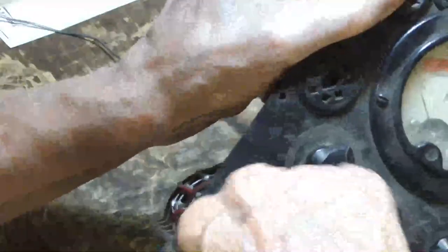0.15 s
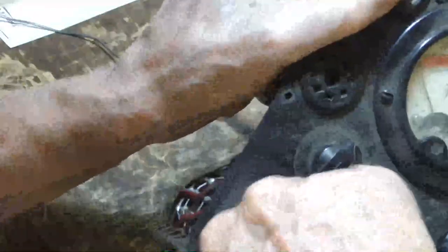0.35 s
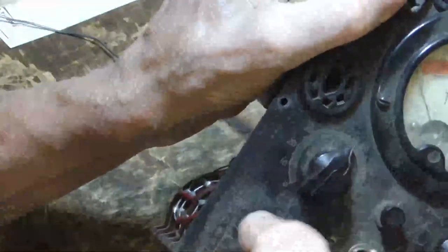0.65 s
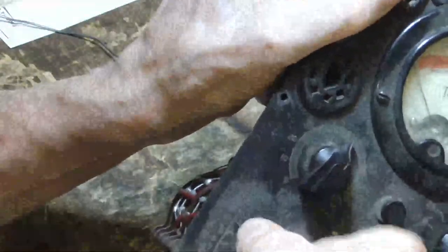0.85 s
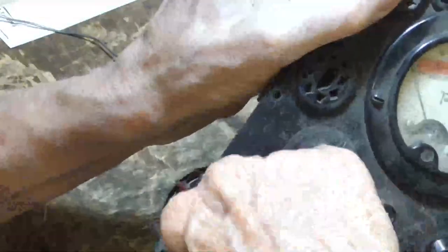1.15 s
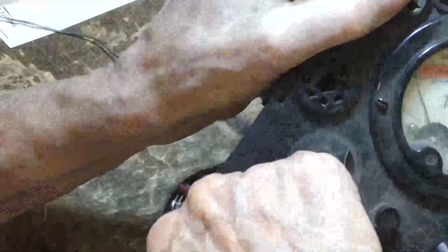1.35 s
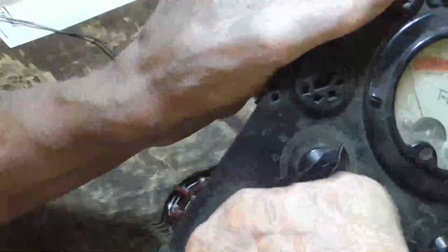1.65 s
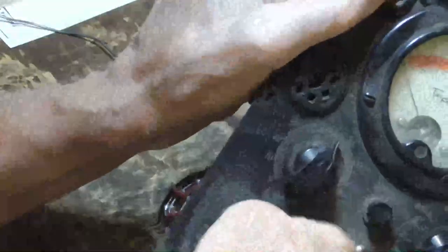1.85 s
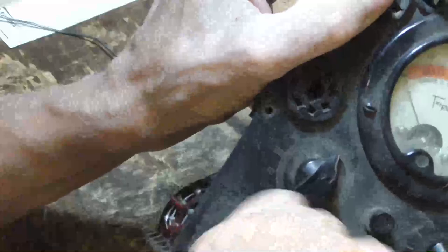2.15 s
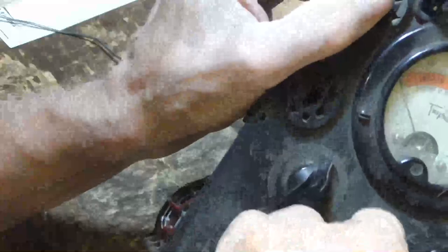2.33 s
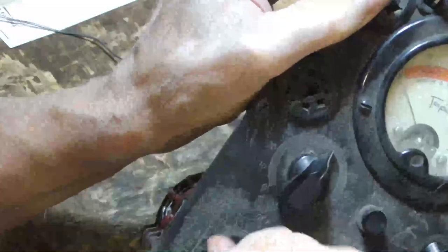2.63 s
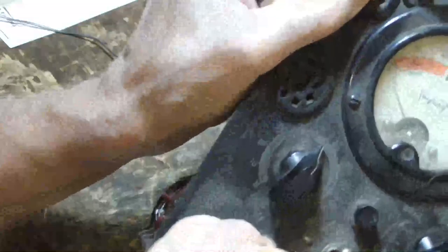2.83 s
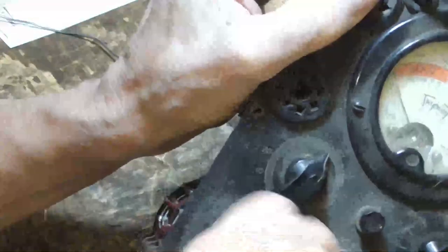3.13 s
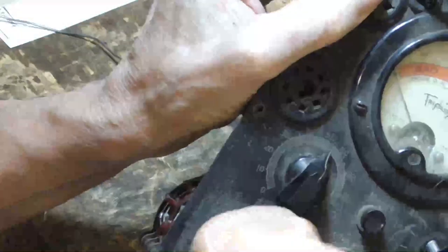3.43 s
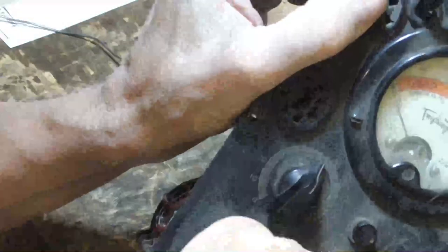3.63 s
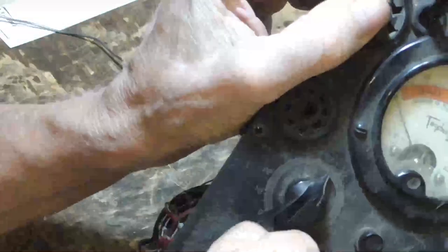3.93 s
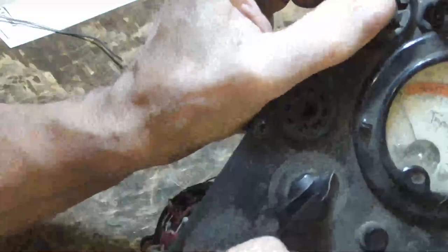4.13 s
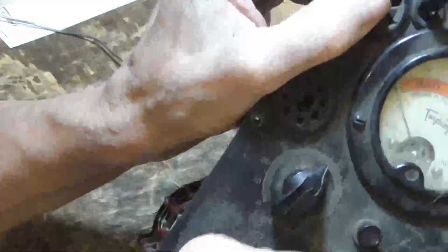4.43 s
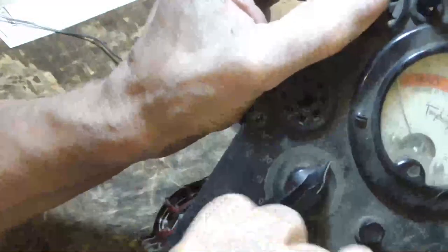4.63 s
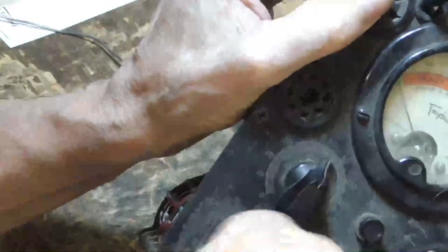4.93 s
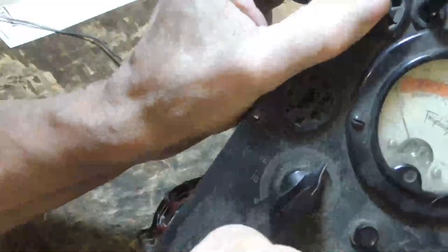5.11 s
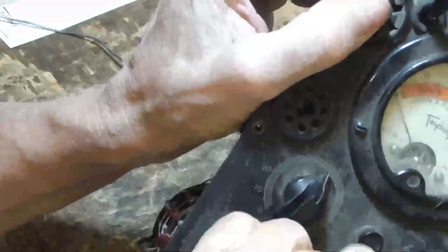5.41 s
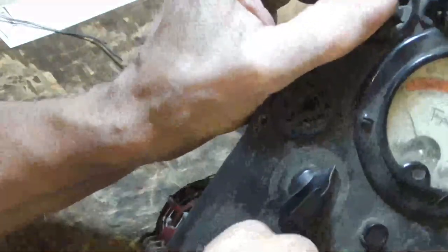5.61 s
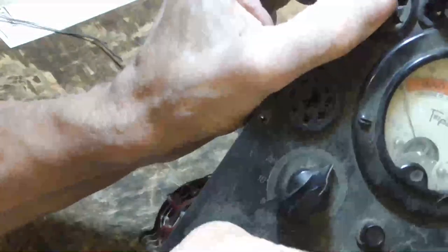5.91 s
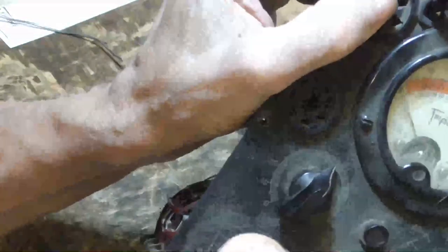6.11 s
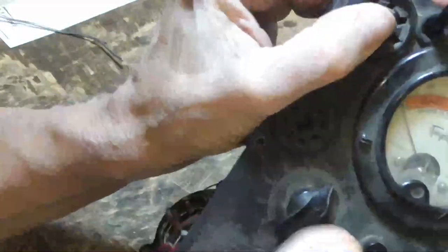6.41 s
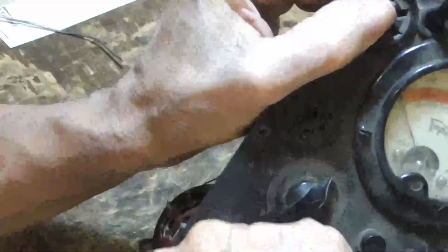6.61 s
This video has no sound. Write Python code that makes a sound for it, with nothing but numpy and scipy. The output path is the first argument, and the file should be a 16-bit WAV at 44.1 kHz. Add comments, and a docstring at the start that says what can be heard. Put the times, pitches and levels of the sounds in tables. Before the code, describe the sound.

A stiff rotary switch is spun by hand in nine quick ratcheting bursts of bright clicks over a steady low motor hum.

```python
"""A motor hums and its fan pushes air; over this a hand spins a clicking rotary selector through nine sweeps.
The hum is a set of unsteady sine tones at multiples of the shaft speed; the air is coloured noise.
Each click is three shaped noise bursts, a bright snap, a clack and a low thud, plus a faint ring of metal.
Sliding wipers rasp while the knob turns, the case swells in low booms, and a small hard room answers each click."""
import sys
import numpy as np
from scipy import signal
from scipy.fft import rfft, irfft, next_fast_len
from scipy.io import wavfile
from scipy.ndimage import uniform_filter1d, map_coordinates

SR = 44100
rng = np.random.default_rng(int(sys.argv[2]) if len(sys.argv) > 2 else 0)


def to_wav(sig):
    """Store sig (one row per channel, or 1-D mono) as 16-bit WAV at the path in sys.argv[1].

    Samples outside -1..1 are clipped; the rate is SR.
    """
    pcm = np.clip(np.atleast_2d(sig), -1, 1) * 32767
    pcm = np.round(pcm).astype(np.int16)
    wavfile.write(sys.argv[1], SR, pcm.T)  # frames by channels


N = 298116  # length in samples


def amp(db):
    """Turn decibels into a gain."""
    return 10 ** (np.asarray(db) / 20)


def unit(x):
    """Scale a sound to an rms level of 1."""
    return x / np.sqrt(np.mean(x ** 2) + 1e-20)


def along(points, hz):
    """Read a curve of (Hz, value) points on a log frequency axis."""
    point_hz, value = np.transpose(points)
    return np.interp(np.log(hz + 1), np.log(point_hz + 1), value)


def wobble(rate):
    """A smooth random curve with `rate` random points a second."""
    knots = rng.standard_normal(int(N * rate / SR) + 4)
    return map_coordinates(knots, [np.arange(N) * rate / SR])


def noise(spectrum, alike, size):
    """Stereo noise of rms 1 with a given colour and left-right likeness (1 = the same in both ears)."""
    hz = np.fft.rfftfreq(size, 1 / SR)
    # likeness sets how the power is shared between the middle and the sides
    turn = np.arccos(np.clip(along(alike, hz), -1, 1)) / 2
    white = rfft(rng.standard_normal((2, size)))
    shares = [np.cos(turn), np.sin(turn)]
    mid, side = irfft(white * amp(along(spectrum, hz)) * shares, size)
    return unit(np.array([mid + side, mid - side]))


# Tones of the motor, before the slow level curve and their own wobble.
# Columns: shaft_multiple [times shaft speed], level_db [dB rms]
MOTOR_TONES = [(1, -59.5), (2, -58.5), (2.3, -61.5), (3, -44.5), (4, -41.5), (5, -51.5), (6, -51.5),
               (6.15, -52), (7, -61), (8, -56.5), (9, -58), (13, -64), (13.75, -60), (16, -54.5), (18, -59),
               (21.82, -57.5)]
# Slow rise and fall of the whole hum. Columns: time_s [s], level_db [dB]
HUM_SWELL = [(0, 0), (1.3, 1.3), (2.5, -0.3), (4, -0.6), (5.5, -1.5), (6.76, -1.5)]
SHAFT_HZ = 57.65  # average turns a second


def motor():
    """A turning shaft hums at multiples of its speed, a little unsteady in speed and in strength."""
    turns = np.cumsum(SHAFT_HZ * (1 + 0.000984 * wobble(2.953))) / SR
    hum = np.zeros(N)
    for multiple, level_db in MOTOR_TONES:
        strength = amp(level_db + 1.1 * wobble(5))
        hum += strength * np.sin(2 * np.pi * (multiple * turns + rng.random()))
    swell_db = np.interp(np.arange(N) / SR, *np.transpose(HUM_SWELL))
    left_right = amp([[-.3], [.3]])
    return np.sqrt(2) * amp(swell_db) * hum * left_right  # sqrt(2): from rms to peak of a sine


# Colour of the fan's rush. Columns: pitch_hz [Hz], level_db [relative dB per Hz]
FAN_COLOUR = [(25, -56), (70, -14), (100, -21), (122, -4), (150, -13), (200, 1.5), (340, 0), (410, -4.5),
              (510, -10), (640, -3), (900, -5), (1250, -10), (1650, -21), (2500, -58)]
# Colour of the faint hiss. Columns: pitch_hz [Hz], level_db [relative dB per Hz]
HISS_COLOUR = [(900, -7), (1800, 0.5), (2700, -5), (3900, -5), (6200, -12), (8000, -8.5), (10000, -11.5),
               (13000, -20), (16000, -28)]
# How alike the air is in both ears. Columns: pitch_hz [Hz], likeness [0 to 1]
AIR_LIKENESS = [(60, 0.68), (200, 1), (400, 0.79), (900, 0.73), (2000, 0.5), (8000, 0.25)]


def air():
    """The motor's fan stirs the air into a low noise, with a faint hiss above it."""
    rush = amp(-39.5 + 0.15 * wobble(12)) * noise(FAN_COLOUR, AIR_LIKENESS, N)
    hiss = amp(-56) * noise(HISS_COLOUR, AIR_LIKENESS, N)
    left_right = amp([[-.3], [.3]])
    return (rush + hiss) * left_right


# The knob in each sweep, turning evenly from one point to the next; one list for each sweep.
# Columns: time_s [s], position [detents], force_db [dB, force of the hand]
KNOB_SWEEPS = [
    [(0.048, 0, -20), (0.1056, 1, -26), (0.1397, 2, -24), (0.164, 3, -24), (0.1747, 4, -22),
     (0.2383, 7, -24), (0.2794, 8, -22.5), (0.3729, 9, -24)],
    [(0.969, 0, -22), (1.01, 1, -24), (1.0647, 2, -22), (1.14, 5, -26), (1.2432, 8, -27), (1.3343, 9, -32)],
    [(1.7816, 0, -29), (1.824, 2, -34), (1.8807, 4, -27.5), (1.9115, 6, -23), (1.9454, 8, -24),
     (1.9728, 9, -30)],
    [(2.6643, 0, -18.5), (2.685, 1, -24), (2.7217, 2, -22), (2.7646, 3, -22.5), (2.8227, 5, -23),
     (2.8493, 6, -26), (2.9137, 9, -26)],
    [(3.3995, 0, -22.5), (3.4303, 1, -30), (3.4842, 2, -31), (3.5685, 5, -27.5), (3.6415, 9, -26),
     (3.6805, 10, -32)],
    [(4.2095, 0, -20.5), (4.2395, 1, -24.5), (4.302, 3, -25), (4.3465, 5, -25), (4.3723, 7, -25),
     (4.392, 8, -25.5)],
    [(4.886, 0, -22), (4.913, 1, -27), (4.9916, 3, -28.5), (5.0175, 4, -24), (5.105, 9, -23.5),
     (5.1453, 10, -28.5)],
    [(5.6906, 0, -20.5), (5.7196, 1, -23), (5.8057, 3, -23.5), (5.84, 4, -20.5), (5.8815, 5, -25),
     (6.0173, 9, -27.5)],
    [(6.4651, 0, -19.5), (6.4937, 1, -29), (6.5664, 3, -26.5), (6.581, 4, -21), (6.6285, 7, -23),
     (6.651, 8, -26)],
]


def detents():
    """List (s, force dB, detents a second, share of sweep done) each time the knob passes a whole position."""
    rows = []
    for sweep in KNOB_SWEEPS:
        time_s, position, force_db = np.transpose(sweep)
        position = np.round(position)
        notches = np.arange(position[0], position[-1] + 1)
        times = np.interp(notches, position, time_s)
        forces = np.interp(notches, position, force_db)
        steps = np.maximum(np.abs(np.diff(times)), .005)  # seconds from click to click
        speeds = 1 / np.r_[steps[0], steps]
        rows += zip(times, forces, speeds, np.linspace(0, 1, len(times)))
    return np.array(rows)


USUAL_FORCE_DB, USUAL_SPEED = -25, 34.6  # an ordinary turn: dB, detents a second
SPRING_HZ, SPRING_SCATTER = 11500, 0.053  # middle pitch of the spring, and its random spread as a share
# body clack against the snap at an ordinary turn; dB lost per dB of force; dB per doubling of speed
CLACK_DB, CLACK_FALLS, CLACK_DB_PER_DOUBLING = -5.5, 0.29, -0.5
THUD_DB, THUD_SCATTER_DB = -39, 2  # case thud at the start of a sweep at usual speed, and its spread
THUD_GROWS_DB, THUD_DB_PER_DOUBLING = 4.5, 3.5  # extra by the end of a sweep; extra per doubling of speed


def blow(force_db, speed, done):
    """Force sets the snap; the clack lags behind it; the case rocks more with speed and through the sweep."""
    doublings = np.log2(speed / USUAL_SPEED)
    clack_db = CLACK_DB - CLACK_FALLS * (force_db - USUAL_FORCE_DB) + CLACK_DB_PER_DOUBLING * doublings
    thud_db = THUD_DB + THUD_GROWS_DB * done + THUD_DB_PER_DOUBLING * doublings
    thud_db += THUD_SCATTER_DB * rng.standard_normal()
    ring_hz = SPRING_HZ * (1 + SPRING_SCATTER * rng.standard_normal())
    return force_db, clack_db, thud_db, ring_hz


def varied(spectrum, spread_db):
    """No two detents seat alike: give each its own broad bumps of colour."""
    return [(hz, db + spread_db * rng.standard_normal()) for hz, db in spectrum]


def burst(carrier, envelope):
    """Shape a carrier so that its energy is that of the envelope."""
    return unit(carrier * envelope) * np.sqrt(np.mean(envelope ** 2))


def strike(t, rise, fall):
    """An envelope that swells up to t = 0 and dies after it; rise and fall in seconds."""
    return np.exp(np.minimum(t, 0) / rise - np.maximum(t, 0) / fall)


def doubled(x, copy_db=-7):
    """A quieter copy follows within about a millisecond, giving each click a varied, comb-like colour."""
    lag = round(rng.uniform(.0002, .0012) * SR)
    return (x + amp(copy_db) * np.roll(x, lag, axis=1)) / np.hypot(1, amp(copy_db))


# Middle colours of the contacts' snap and the body's clack, and the colour of the case's thud.
# Columns: pitch_hz [Hz], level_db [relative dB per Hz]
SNAP_COLOUR = [(4500, -13), (6500, -13.5), (7900, -4), (10000, 0.5), (11800, 0), (13200, -1.5), (15000, -7),
               (16000, -14)]
CLACK_COLOUR = [(300, -12), (900, -2), (1400, -5.5), (1900, -6), (2600, -6), (3400, 3.5), (4700, 5.5),
                (6000, -4), (8000, -3)]
THUD_COLOUR = [(30, -55), (62, -4), (88, -9), (100, -12.5), (120, 1.5), (148, -2.5), (190, 7), (250, -1.5),
               (370, -6.5), (500, -7.5), (1000, -16.5)]
# Faint ring of the metal parts, around which each detent varies.
# Columns: pitch_hz [Hz], level_db [relative dB], t60_s [s to fall by 60 dB]
METAL_RING = [(1530, -27, 0.059), (3450, -27, 0.051), (4610, -26, .04), (5280, -24.5, 0.075),
              (7860, -28, .03), (11200, -17, .02)]


def detent(snap_db, clack_db, thud_db, ring_hz, size=4096):
    """The contacts scrape over the cam, snap home and jolt the body and the case."""
    t = (np.arange(size) - size // 16) / SR  # t = 0 is the snap
    ring = [(ring_hz / 2, -70), (ring_hz * .85, -30), (ring_hz * .95, -6), (ring_hz, 0),
            (ring_hz / .95, -6), (ring_hz / .85, -30), (SR / 2, -60)]
    contacts = noise(varied(SNAP_COLOUR, spread_db=1.2), [(8000, 0.72), (14000, 0.41)], size)
    spring = noise(ring, [(10000, 0.56)], size)
    # a scrape leads in, the spring seats with a hard peak, then chatters for a few milliseconds
    scrape = amp(-14) * strike(t, rise=.0088, fall=.0011)
    seat = strike(t, rise=.0008, fall=.0007)
    chatter = amp(-5) * strike(t, rise=.0011, fall=.0043)
    snap_shape = amp(2) * (seat + chatter) + scrape
    left_right = amp([[-2.2], [1.8]])
    snap = amp(snap_db) * burst(contacts + amp(-13) * spring, snap_shape) * left_right

    body = noise(varied(CLACK_COLOUR, spread_db=1.1), [(1000, 0.63), (5000, 0.99)], size)
    clack = amp(snap_db + clack_db) * burst(body, strike(t, rise=.0022, fall=.0054))
    case = noise(THUD_COLOUR, [(100, 0.92)], size)
    thud = amp(thud_db) * burst(case, strike(t - .003, rise=.0038, fall=.021))  # peaks 3 ms late

    after = np.maximum(t, 0)
    metal = np.zeros(size)
    for hz, level_db, t60 in METAL_RING:
        fading = amp(level_db + rng.normal(0, 2.2) - 60 * after / t60)
        metal += fading * np.sin(2 * np.pi * hz * (1 + rng.normal(0, 0.0084)) * after)
    return doubled(snap + clack) + thud + amp(snap_db + 2) * metal


# How long the room rings. Columns: pitch_hz [Hz], t60_s [s to fall by 60 dB]
ROOM_FADE = [(120, 1), (500, 0.15), (1500, .26), (4000, 0.29), (9000, .28), (15000, 0.31)]


def room(x, size=14000):
    """The bench and walls answer with a smear of echoes, each frequency dying at its own speed."""
    echoes = noise([(1000, 0)], [(200, 0.94), (1500, 0.66), (10000, 0.084)], size)
    hz, t, bands = signal.stft(echoes, SR, nperseg=256)
    colour_db = [(200, -5), (1500, 1), (4000, 1.5), (8000, 3), (11000, -3.5), (15000, -10)]
    colour = amp(along(colour_db, hz))[:, None]
    build = 1 - np.exp(-t / .0042)  # the echoes take a few milliseconds to gather
    fade = amp(-60 * t / along(ROOM_FADE, hz)[:, None])
    tail = signal.istft(bands * build * fade * colour, SR, nperseg=256)[1]
    return signal.fftconvolve(x.mean(0)[None], unit(tail) / np.sqrt(tail.shape[1]), axes=1)


def add(track, x, start):
    """Mix x into the track from sample start on."""
    part = x[:, :track.shape[1] - start]
    track[:, start:start + part.shape[1]] += part


LIFT_LEAD, LIFT_DB = .24, -11  # lift tick: share of a step before the snap; dB against a full detent


def selector(size=4096):
    """Contacts tick faintly as they lift once the knob is moving, then snap home and excite the room."""
    track = np.zeros((2, N))
    for time_s, force_db, speed, done in detents():
        hit = blow(force_db, speed, done)
        start = round(time_s * SR) - size // 16
        if done > 0:
            add(track, amp(LIFT_DB) * detent(*hit), start - round(LIFT_LEAD / speed * SR))
        add(track, detent(*hit), start)
        # the case sends its own version of the click into the room
        add(track, amp(-6.5) * room(detent(*hit)), start)
    return track


# Colour of the sliding wipers. Columns: pitch_hz [Hz], level_db [relative dB per Hz]
RASP_COLOUR = [(500, -11), (1300, -5), (2000, -4), (3300, 4), (4800, 4), (6300, -6), (8500, 6.5),
               (11500, 5), (15500, -2)]


def wipers():
    """The wipers rasp over their contacts, louder the faster and harder the knob is turned."""
    t = np.arange(N) / SR
    times, forces = detents().T[:2]
    # position counts on from sweep to sweep, so a very slow step fills each gap
    position = np.interp(t, times, np.arange(len(times)))
    speed = np.abs(uniform_filter1d(np.gradient(position) * SR, size=700))  # detents a second
    force_db = np.interp(t, times, forces)
    loudness = amp(force_db - 11.5) * (speed / 55) ** 1.4
    grain = unit(amp(2.8 * wobble(700)))  # fast random roughness
    return loudness * grain * noise(RASP_COLOUR, [(1000, 0.85), (10000, 0.62)], N)


# Low swells of the case.
# Columns: middle_s [s], level_db [dB peak], pitch_hz [Hz at the middle], half_length_s [s]
CASE_SWELLS = [(0.18, -43, 125, 0.043), (1.232, -40.5, 104, 0.087), (1.95, -31, 123, 0.064),
               (2.882, -39.5, 107, .045), (3.62, -41, 112, 0.073), (6.588, -37.5, 123.5, 0.063)]


def booms(sag_hz=170):
    """The case swings on a low panel mode; each boom's pitch slides down by sag_hz a second."""
    out = np.zeros(N)
    for middle_s, level_db, hz, half_length in CASE_SWELLS:
        t = np.arange(N) / SR - middle_s
        swell = amp(level_db) * np.exp(-(t / half_length) ** 2)
        out += swell * np.sin(2 * np.pi * (hz - sag_hz * t / 2) * t)
    return out


def scene():
    """The steady motor and air, with the switch over them."""
    return motor() + air() + selector() + wipers() + booms()


TOP_HZ = 15650  # band limit of the recorder


def record(dry):
    """The recorder cuts off very steeply above its band limit."""
    size = next_fast_len(N + SR // 2)
    hz = np.fft.rfftfreq(size, 1 / SR)
    lowpass = 1 / np.sqrt(1 + (hz / TOP_HZ) ** 160)
    return irfft(rfft(dry, size) * lowpass, size)[:, :N]


dry = scene()
out = record(dry)
to_wav(out)
```